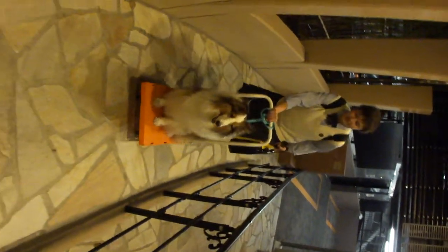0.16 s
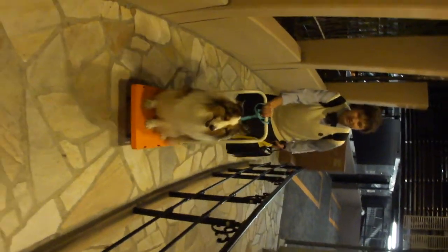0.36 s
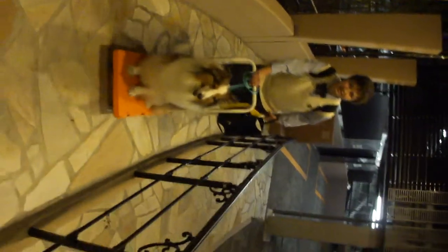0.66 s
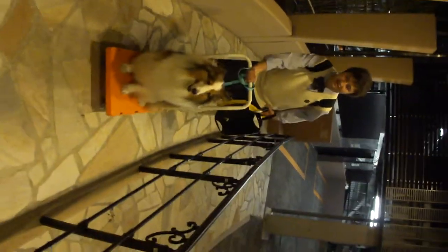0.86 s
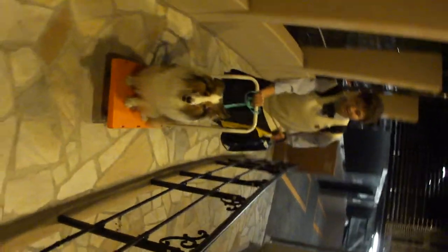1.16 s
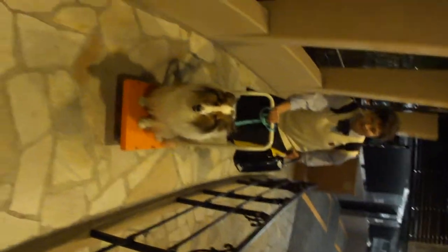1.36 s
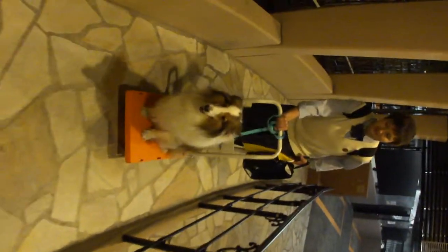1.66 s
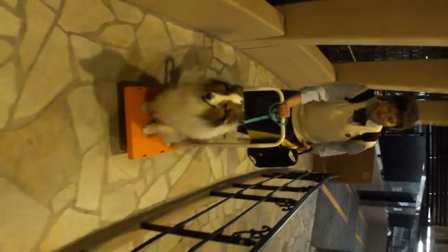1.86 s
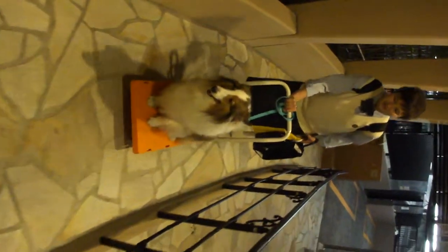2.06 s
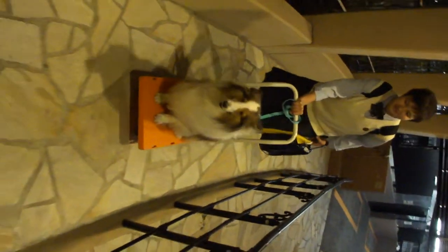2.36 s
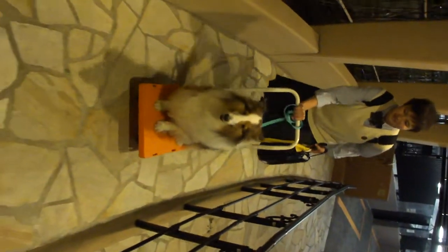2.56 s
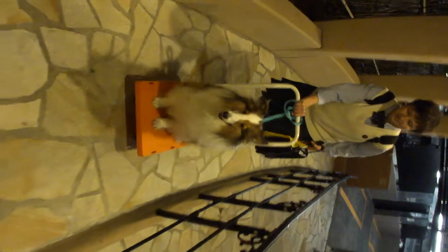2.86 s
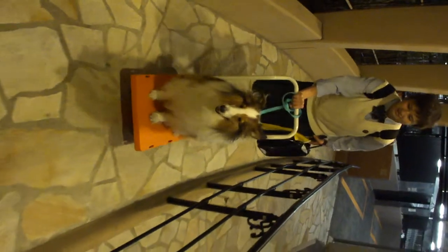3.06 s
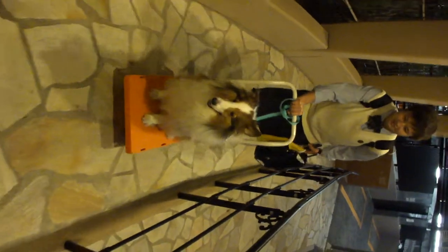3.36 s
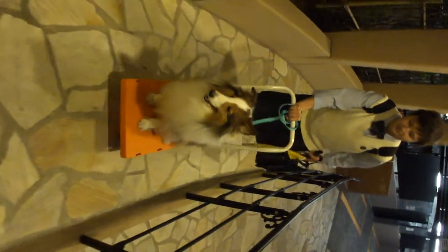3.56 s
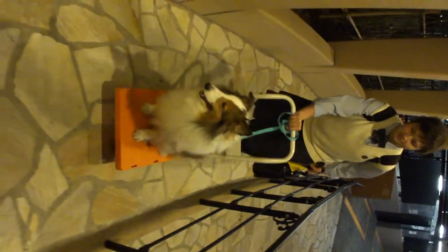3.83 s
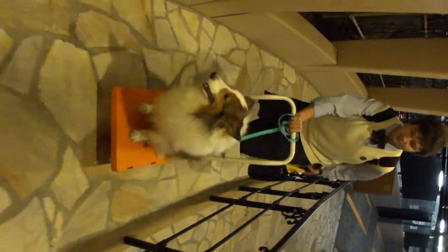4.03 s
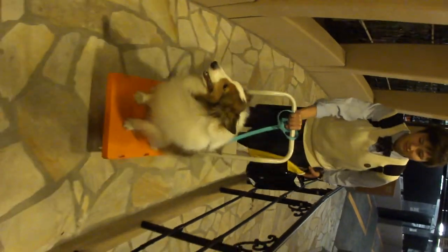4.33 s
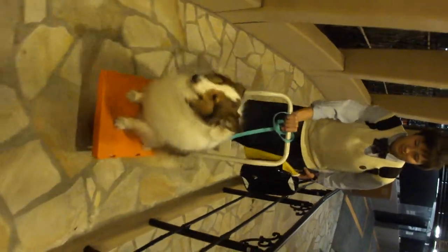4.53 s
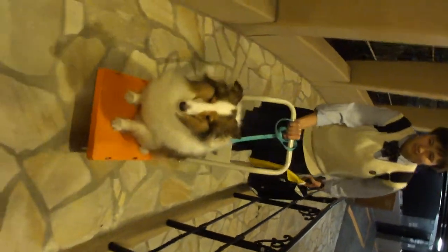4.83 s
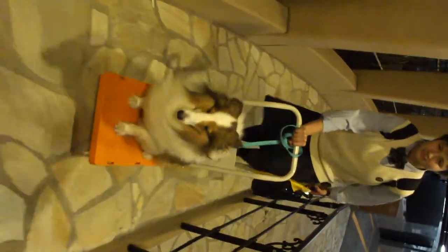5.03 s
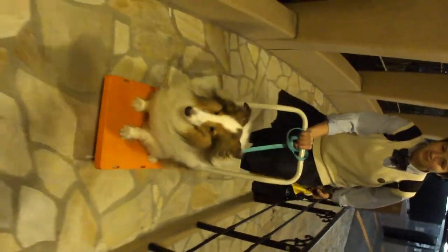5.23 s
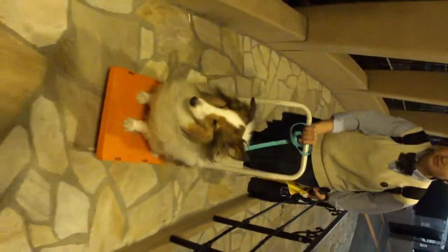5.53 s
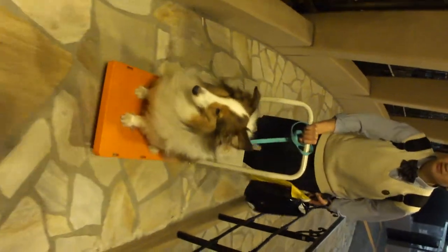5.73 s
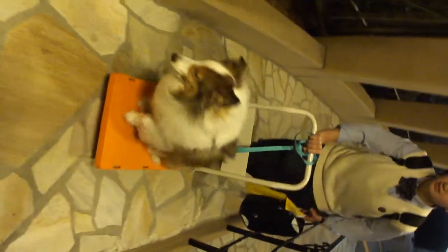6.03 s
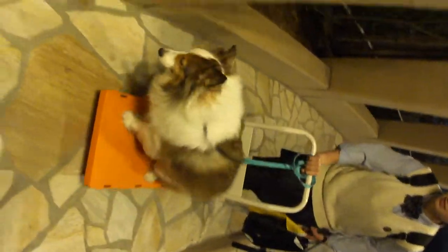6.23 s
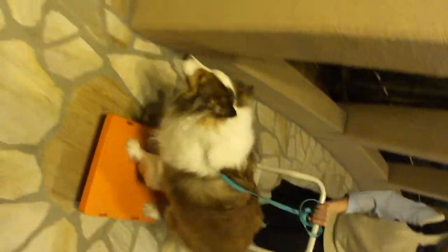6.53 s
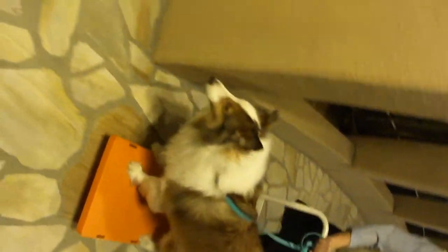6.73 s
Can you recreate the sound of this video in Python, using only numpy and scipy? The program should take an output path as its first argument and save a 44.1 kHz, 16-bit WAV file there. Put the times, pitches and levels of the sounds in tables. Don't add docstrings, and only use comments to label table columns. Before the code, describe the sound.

A loaded hand cart on small hard wheels rattles over uneven flagstones in a walled passage, knocking hollowly while loose metal ticks and air puffs.

```python
import sys
import numpy as np
from scipy import signal
from scipy.io import wavfile
from scipy.ndimage import uniform_filter1d, minimum_filter1d

SR = 44100
rng = np.random.default_rng(int(sys.argv[2]) if len(sys.argv) > 2 else 0)


def convert_level_to_amplitude(level_db):
    exponent = np.asarray(level_db, float) / 20
    return 10 ** exponent


def store_wav(level_fs):
    pcm = np.round(np.clip(np.atleast_2d(level_fs), -1, 1) * 32767)
    wavfile.write(sys.argv[1], SR, pcm.T.astype(np.int16))


N = 303849

# peak_s, level_db, fade_s (time to fade 10 dB)
AIR_PUFFS = [(0, -34, .03), (.11, -40, .05), (1.84, -42, .1), (2.53, -38, .1), (4.36, -40, .12),
             (3.75, -33, .05), (4.99, -38, .1), (5.3, -41, .2), (5.84, -33, .17), (6.39, -38, .06),
             (6.6, -37, .12), (6.89, -33, .03)]
# freq_hz, density_db (per Hz)
AIR_SPECTRUM = [(20, -29.5), (50, -23), (90, -12.5), (150, 0.5), (220, -4.5), (320, -9), (500, -14),
                (900, -36), (2500, -99)]
# freq_hz, t60_s
PASSAGE_DECAY = [(200, 0.58), (600, 0.44), (1400, 0.31), (3000, 0.28), (9000, 0.22)]
# freq_hz, gain_db
MIC_COLOUR = [(100, -33), (160, -12.5), (230, -6.5), (300, -1), (1800, 3), (2400, 1.5), (2750, -9.5),
              (3000, -27.5), (4000, -43.5), (9000, -69)]
# peak_s, level_db, fade_s (time to fade 10 dB)
METAL_SHAKES = [(.09, -44, .1), (.33, -49, .14), (.68, -51, .3), (.95, -53, .3), (1.3, -42, .14),
                (1.47, -46, .07), (1.58, -39, .06), (1.86, -40, .08), (1.8, -51, .5), (2.2, -48, .15),
                (2.45, -43, .08), (2.57, -44, .08), (2.95, -48, .4), (3.2, -51, .15), (3.53, -46, .2),
                (3.77, -48, .12), (4.0, -50, .2), (4.2, -47, .05), (4.35, -45, .2), (4.77, -46, .16),
                (5.32, -51, .5), (5.39, -35, .04), (5.42, -44, .1), (5.56, -42, .06), (5.8, -50, .3),
                (6.04, -40, .04), (6.13, -38, .05), (6.23, -43, .15), (6.44, -40, .22), (6.85, -49, .15)]
# freq_hz, density_db (per Hz)
SIZZLE_SPECTRUM = [(2400, -35), (2700, 2), (3050, -18), (3500, -4), (4050, -27), (4500, -7.5), (5100, -25),
                   (5600, -1), (6500, -1), (8000, -1.5), (10000, -6.5), (11000, -13.5), (11600, -39.5),
                   (15500, -70)]
# start_s, peak_db
METAL_TICKS = [(.095, -24.5), (.5607, -30), (.7123, -25.5), (1.205, -34), (1.298, -27), (1.477, -26),
               (1.5584, -30), (1.5756, -24.5), (1.8524, -20.5), (2.3514, -33), (2.4618, -25),
               (2.561, -28.5), (2.8667, -30.5), (3.1214, -26), (3.3224, -33), (4.2204, -33), (4.3346, -30),
               (4.7608, -30), (5.3886, -18.5), (5.5458, -9), (6.0299, -23.5), (6.109, -27), (6.1379, -22.5),
               (6.2095, -30), (6.2418, -25.5), (6.378, -27), (6.4188, -24.5), (6.4847, -25),
               (6.5077, -23.5), (6.6777, -28)]
# start_s, peak_db
RIM_CRACKS = [(.375, -23), (.3985, -28), (.6544, -22), (.712, -27.5), (1.1358, -35.5), (1.2032, -33),
              (1.28, -27), (1.3134, -27), (1.562, -31), (1.5743, -23), (1.6087, -26), (1.6287, -22),
              (2.2884, -29), (2.5615, -24), (2.8633, -29), (3.127, -29.5), (3.1577, -36), (3.2245, -34),
              (3.694, -33), (4.0018, -41), (4.3583, -31), (4.76, -22.5), (4.9953, -32), (5.1315, -33),
              (5.3916, -22), (6.096, -32), (6.138, -28), (6.314, -30), (6.4218, -24), (6.6777, -24)]
# freq_hz, density_db (per Hz)
CRACK_SPECTRUM = [(1500, -44.5), (2800, 7), (5200, -5.5), (8000, -9), (11000, -15), (14000, -19.5),
                  (15300, -59)]
# pitch_hz, level_db, t60_s
LOW_DECK_MODES = [(231.7, -5, 0.078), (264.4, 2, 0.067), (310.4, -2, 0.083), (366.3, -0.5, 0.16),
                  (414.3, -1.5, 0.092)]
# pitch_hz, level_db, t60_s
DECK_MODES = [(493, -3, 0.042), (577.7, -4, 0.16), (641, -2, 0.096), (726, 1.5, 0.054), (796, -3.5, 0.042),
              (935, -1, 0.047), (1009.6, -3.5, .04), (1177.4, -1.5, 0.065), (1390, -5.5, 0.014),
              (1598, -3, 0.034), (1949, -3, 0.016), (2327, -14.5, 0.036)]
# peak_s, chatter_db, fade_s (time to fade 10 dB), low_load_db (on low modes)
ROUGH_PATCHES = [(0, -10, .05, 2), (.15, -17.5, .2, -2), (.43, -18, .15, 4), (.63, -19, .2, -8),
                 (.96, -21, .15, 1), (1.21, -17, .11, -4), (1.5, -20, .15, 0), (1.69, -20, .1, 0),
                 (1.91, -12, .08, -4), (2.22, -12.5, .12, -4), (2.54, -17, .1, -3), (2.65, -16, .09, -2),
                 (2.93, -23, .1, 7), (3.04, -18, .15, -2), (3.47, -16, .1, 2), (3.75, -21, .12, -8),
                 (3.84, -16, .06, 0), (4.0, -12.5, .08, -10), (4.22, -23, .04, 5), (4.43, -17.5, .13, -2),
                 (4.8, -26, .13, 4), (4.99, -14.5, .07, -6), (5.2, -29, .15, -3), (5.39, -8.5, .09, -9),
                 (5.83, -18.5, .08, -4), (6.12, -14, .08, -2), (6.33, -24, .15, -5), (6.52, -19.5, .13, -3),
                 (6.62, -21, .06, 10), (6.83, -13, .05, -4)]
# start_s, blow_db, pitch_hz (of the struck part), brightness_db
EDGE_BLOWS = [(.367, 3.5, 1118, -6.5), (.562, -1, 580, -3.5), (.652, 2.5, 970, -6), (.776, -13.5, 555, -12),
              (.861, -8, 585, -9), (.901, -1, 897, -12.5), (1.167, -15, 630, -17), (1.879, -4, 587, -12.5),
              (2.168, -6.5, 680, -16), (2.287, -2, 966, -27), (2.562, 2.5, 1240, -4),
              (2.733, -8.5, 870, -10), (2.859, .5, 641, -13.5), (3.125, 1, 600, -5),
              (3.223, -2.5, 641, -17), (3.405, -9, 630, -17), (3.46, 1, 641, -18), (3.604, -7.5, 596, -3.5),
              (3.671, -9, 877, -16), (3.98, 0, 1260, -22), (4.046, -5, 740, -22), (4.067, -19, 790, -10),
              (4.334, -5.5, 770, -6), (5.603, -3.5, 753, -15), (5.715, -11.5, 744, -8),
              (6.02, -8, 574, -19), (6.094, 1, 625, -14), (6.237, -6.5, 930, -10), (6.396, -9.5, 340, -21),
              (6.795, -9, 773, -14)]
# start_s, blow_db, pitch_hz, brightness_db
JOINT_BLOWS = [(.091, 1, 593, -1), (.264, -2, 940, -3), (.799, -6.5, 1140, -8), (1.102, -20, 590, -17),
               (1.134, -4.5, 716, -6), (1.264, -4, 921, -9), (1.279, -.5, 670, -.5), (1.308, 1, 727, -1.5),
               (1.56, -3.5, 1190, -14), (1.574, 2.5, 607, -5.5), (1.627, 3.5, 1228, -2),
               (2.349, -4.5, 770, -19), (2.461, -5.5, 600, 0), (2.688, -31, 610, -23),
               (3.099, -7, 517, -12), (3.44, -3.5, 600, -14), (3.694, -1.5, 806, -11.5),
               (3.826, -2.5, 756, -20), (4.182, -7, 770, -15), (4.356, -2, 763, -5),
               (4.441, -4.5, 589, -18), (4.759, .5, 790, -9.5), (5.133, -2, 583, -13),
               (5.284, -6.5, 530, -28), (5.316, -5, 585, -13), (6.199, -8.5, 780, -20),
               (6.264, -2, 549, -16), (6.287, -1, 720, -16), (6.555, -23, 670, -20)]
# start_s, blow_db, pitch_hz, brightness_db, thud_db
DEEP_DROPS = [(.711, -3.5, 1220, -2.5, 0), (1.482, -2.5, 614, -7.5, 3), (2.064, -13, 431, -10, 9),
              (2.506, -3.5, 529, -17, 2.5), (3.193, -5, 865, -8.5, 0), (3.283, -5, 860, -10, 6),
              (3.575, -6, 670, -20, -1), (3.797, -9, 603, -6, 2.5), (3.951, -19, 374, -17, 9),
              (3.963, -18.5, 641, -18, 2), (4.124, -12.5, 593, -20, 2), (4.587, -10, 760, -14, -4),
              (4.993, -3, 483, -12, -1), (5.373, .5, 584, -10, 1.5), (5.652, -12, 664, -8, -1),
              (5.738, -5.5, 1205, -8, 0), (5.775, -15.5, 560, -22, 0), (6.135, 1, 578, 5, -1.5),
              (6.313, 0, 750, -9, 1), (6.42, 3, 565, -15, 3), (6.594, -4, 381, -22, 4),
              (6.679, .5, 590, -24, 1), (6.778, -24, 651, -4, -1)]


def evened(x):
    return x / np.sqrt(np.mean(x ** 2) + 1e-20)


def steadied(x, share):
    slow_power = uniform_filter1d(x ** 2, 2600) + 1e-9
    return evened(x / slow_power ** (share / 2))


def read(points, hz):
    f, value = np.transpose(points)
    return np.interp(np.log(hz + 1), np.log(f + 1), value)


def add(mix, start_s, sound):
    part = mix[..., max(round(start_s * SR), 0):][..., :sound.shape[-1]]
    part += sound[..., :part.shape[-1]]


def colour(x, points):
    gain_db = np.maximum(read(points, abs(np.fft.fftfreq(8192, 1 / SR))), -100)
    log_gain = np.log(convert_level_to_amplitude(gain_db))
    taps = np.fft.ifft(np.exp(np.conj(signal.hilbert(log_gain)))).real[:4096]
    return signal.oaconvolve(x, taps[None], axes=1)[:, :N]


def swells(rows, rise, floor_db):
    t = np.arange(0, N / SR, .002)
    power = convert_level_to_amplitude(floor_db) ** 2
    for start_s, level_db, fade_s, *_ in rows:
        away = np.maximum(t - start_s, (start_s - t) / rise)
        power = power + convert_level_to_amplitude(level_db - 10 * away / fade_s) ** 2
    return np.interp(np.arange(N) / SR, t, np.sqrt(power))


def bumps(per_s, spread_db):
    size = convert_level_to_amplitude(spread_db * np.minimum(rng.exponential(1, N), 2.5)) * rng.choice([-1., 1.], N)
    return size * (rng.random(N) < per_s / SR)


def buffet():
    lumps = evened(uniform_filter1d(rng.standard_normal((2, N)), 900, 1))
    gusty = rng.standard_normal((2, N)) * convert_level_to_amplitude(3.3 * lumps)
    air = evened(colour(gusty, AIR_SPECTRUM))
    return convert_level_to_amplitude(3.5) * swells(AIR_PUFFS, rise=.5, floor_db=-48.5) * air


def echoes():
    taps = np.zeros((2, SR // 2))
    at = np.arange(300, SR // 2 - 20, 20) + rng.integers(0, 20, (2, (SR // 2 - 301) // 20))
    np.put_along_axis(taps, at, rng.choice([-1., 1.], at.shape), 1)
    taps[1] = 0.85 * taps[0] + 0.25 * taps[1] + 2.5 * np.diff(taps[1], prepend=0)
    hz, t, z = signal.stft(taps, SR, nperseg=256)
    decay = convert_level_to_amplitude(-60 * t / read(PASSAGE_DECAY, hz)[:, None])
    tail = signal.istft(z * decay, SR, nperseg=256)[1]
    return tail / np.linalg.norm(tail[0])


def passage(x):
    turn = np.arange(N) / SR / .45 % 4
    out = np.zeros((2, N))
    for k in range(4):
        distance = abs((turn - k + 2) % 4 - 2)
        share = np.cos(np.pi / 2 * np.minimum(distance, 1))
        out += signal.oaconvolve((share * x)[None], echoes(), axes=1)[:, :N]
    return out


def clicks(rows, spectrum, t60, apart):
    out = np.zeros((2, N))
    t = np.arange(1000) / SR
    shape = convert_level_to_amplitude(-60 * t / t60) * (1 - np.exp(-t / 0.00071))
    for start_s, peak_db in rows:
        a, b = rng.standard_normal((2, len(t)))
        ports = np.array([a, np.sqrt(1 - apart ** 2) * a + apart * b])
        add(out, start_s, convert_level_to_amplitude(peak_db) * shape * ports)
    filter_size = np.linalg.norm(colour(signal.unit_impulse(4096)[None], spectrum))
    return colour(out, spectrum) / filter_size


def metal():
    jolts = signal.lfilter([1], [1, -np.exp(-1 / (.02 * SR))], abs(bumps(35, 2.5)))
    flurry = steadied(np.sqrt(1.2 + jolts ** 2), 0.47)
    grit = np.array([bumps(3400, 3.9), bumps(3400, 2.8)])
    hiss = evened(rng.standard_normal((2, N)) + 1.5 * evened(grit) + 0.44 * rng.standard_normal(N))
    sizzle = evened(colour(flurry * hiss, SIZZLE_SPECTRUM))
    sizzle = convert_level_to_amplitude(4) * swells(METAL_SHAKES, rise=.3, floor_db=-59) * sizzle
    ticks = convert_level_to_amplitude(5) * clicks(METAL_TICKS, SIZZLE_SPECTRUM[6:], t60=.008, apart=.75)
    return sizzle + ticks + convert_level_to_amplitude(10.5) * clicks(RIM_CRACKS, CRACK_SPECTRUM, t60=.006, apart=.6)


def ring(hz, t60, rise_s):
    t = np.arange(2600) / SR
    envelope = np.exp(-np.log(1000) * t / t60) * (1 - np.exp(-t / rise_s)) * (1 - t / t[-1])
    return envelope * np.sin(2 * np.pi * hz * t)


def strike(modes, damp, rise_s, detune):
    out = 0
    luck = rng.standard_normal((len(modes), 2))
    for (strength, drift), (hz, level_db, t60) in zip(luck, modes):
        out = out + strength * convert_level_to_amplitude(level_db) * ring(hz * (1 + detune * drift), damp * t60, rise_s)
    return out


def chatter():
    high, low = np.zeros(N), np.zeros(N)
    for _ in range(11):
        high += signal.oaconvolve(bumps(28, 4.5), strike(DECK_MODES, .33, .0005, .09))[:N]
    for _ in range(6):
        low += signal.oaconvolve(bumps(30, 3.6), strike(LOW_DECK_MODES, .99, .00081, .05))[:N]
    loaded = [(s, db + load_db, fade_s) for s, db, fade_s, load_db in ROUGH_PATCHES]
    rise, smooth_db = .7, -36
    upper = swells(ROUGH_PATCHES, rise, smooth_db) * steadied(high, 0.23)
    lower = swells(loaded, rise, smooth_db) * steadied(low, 1.0)
    return convert_level_to_amplitude(-4.5) * (upper + convert_level_to_amplitude(-1.5) * lower)


def knocks():
    out = np.zeros(N)
    edge_thud_db, joint_thud_db = -14, -4.5
    rows = [(*row, edge_thud_db) for row in EDGE_BLOWS]
    rows += [(*row, joint_thud_db) for row in JOINT_BLOWS]
    rows += list(DEEP_DROPS)
    for start_s, blow_db, hz, bright_db, thud_db in sorted(map(tuple, rows)):
        modes = [(f, d + (bright_db + 8.5) * np.clip(np.log2(f / 700), 0, 1), r) for f, d, r in DECK_MODES]
        snap = ring(hz, .014, .0006) + .7 * strike(modes, .22, .0004, .06)
        blow = snap + convert_level_to_amplitude(-14) * strike(modes, 0.79, 0.0029, 0.055)
        thud = strike(LOW_DECK_MODES, 0.76, 0.004, 0.041)
        bounce = strike(modes, 0.69, 0.0012, 0.058)
        knock = blow / abs(blow).max() + convert_level_to_amplitude(thud_db - 10) * thud
        add(out, start_s, convert_level_to_amplitude(blow_db - .5) * knock)
        bounce_s = start_s + rng.uniform(0.00406, .022)
        add(out, bounce_s, convert_level_to_amplitude(blow_db - 9.5) * bounce / abs(bounce).max())
    return out


def scene():
    cart = chatter() + knocks()
    heard = cart + convert_level_to_amplitude(-4.5) * passage(cart)
    cart_at_ports = (colour(heard, MIC_COLOUR) + metal()) * convert_level_to_amplitude([[-.9], [.9]])
    return cart_at_ports + buffet()


def top_cut(x):
    return signal.sosfilt(signal.butter(12, 15300, fs=SR, output="sos"), x)


def record(dry):
    window = 177
    room = minimum_filter1d(1 / np.maximum(abs(dry).max(0), 1), window)
    held = np.clip(dry * uniform_filter1d(room, window), -1, 1)
    low_cut = signal.butter(1, 40, "high", fs=SR, output="sos")
    return top_cut(signal.sosfilt(low_cut, held))


dry = scene()
out = record(dry)
store_wav(out)
```